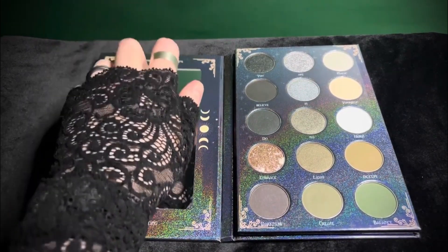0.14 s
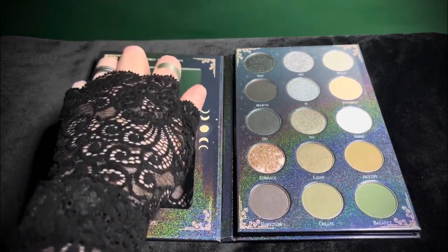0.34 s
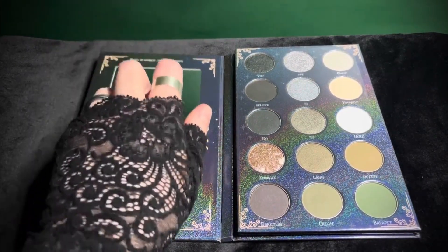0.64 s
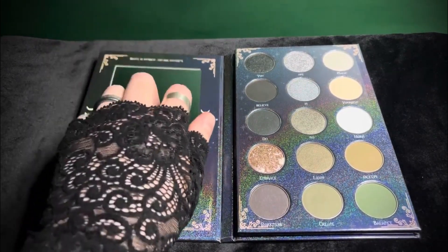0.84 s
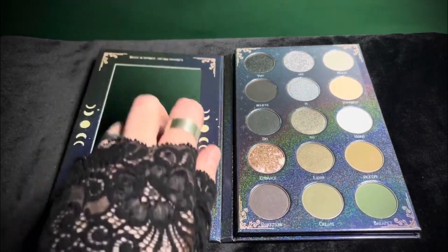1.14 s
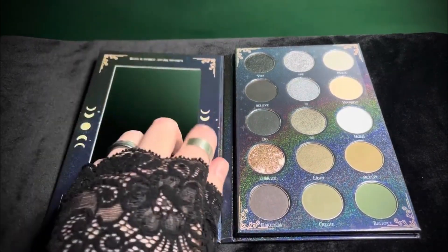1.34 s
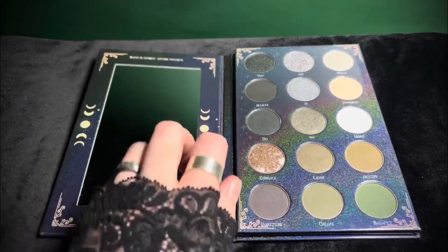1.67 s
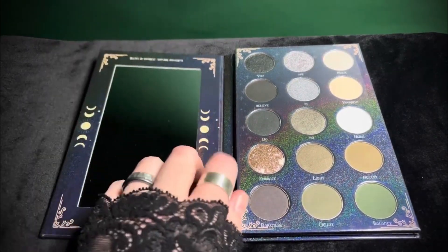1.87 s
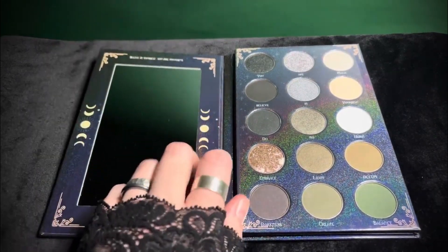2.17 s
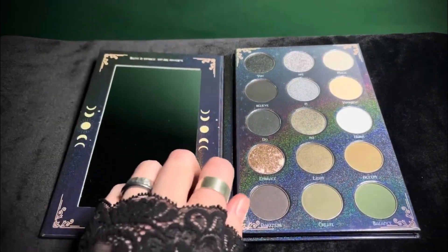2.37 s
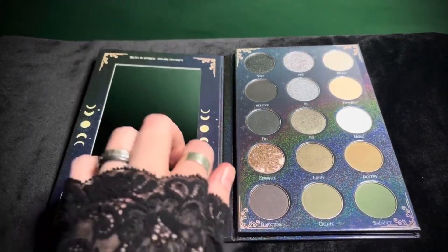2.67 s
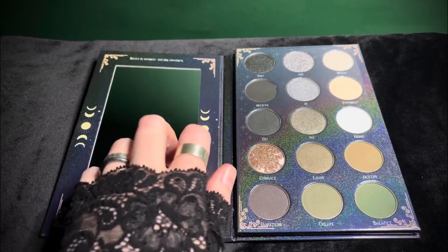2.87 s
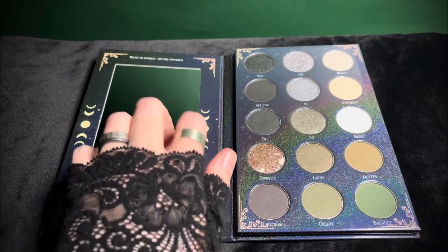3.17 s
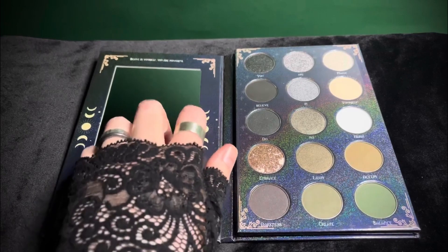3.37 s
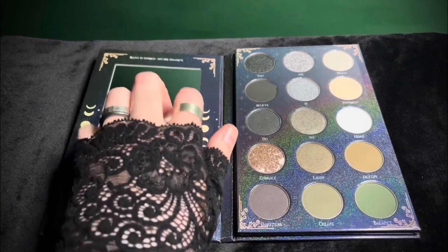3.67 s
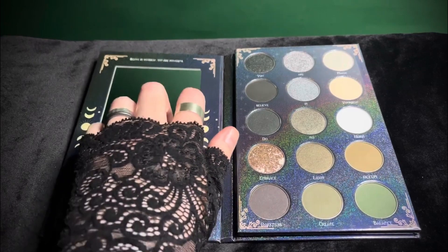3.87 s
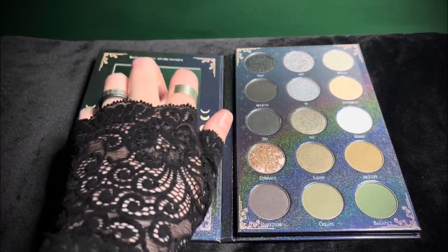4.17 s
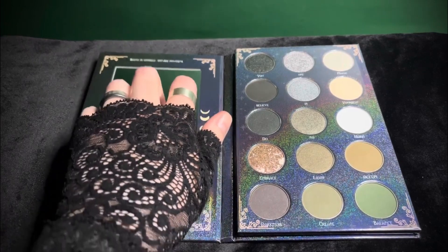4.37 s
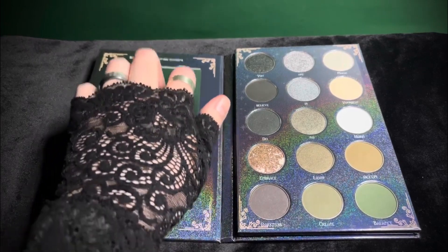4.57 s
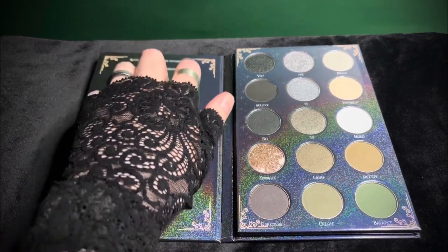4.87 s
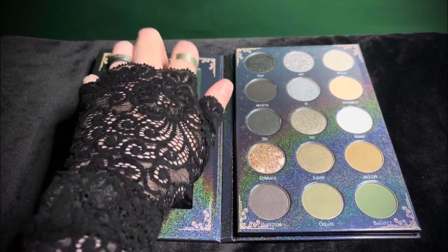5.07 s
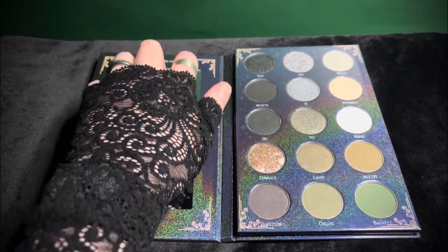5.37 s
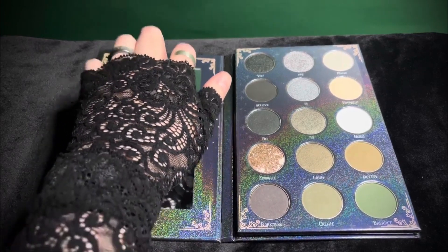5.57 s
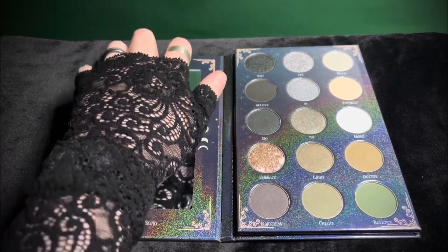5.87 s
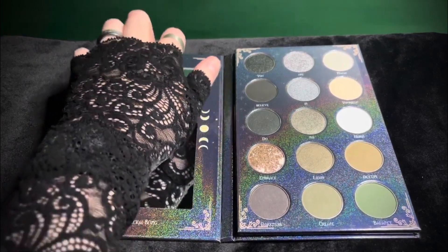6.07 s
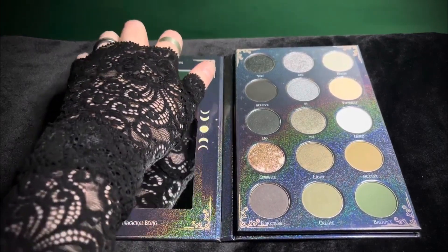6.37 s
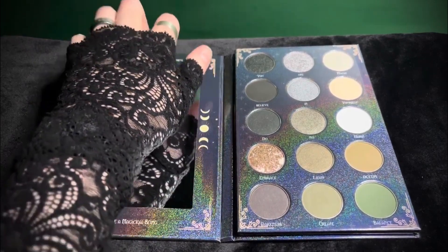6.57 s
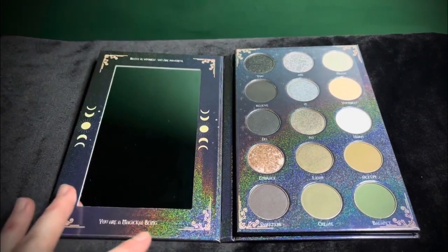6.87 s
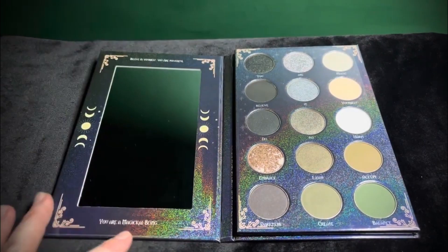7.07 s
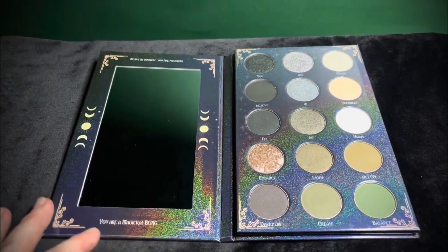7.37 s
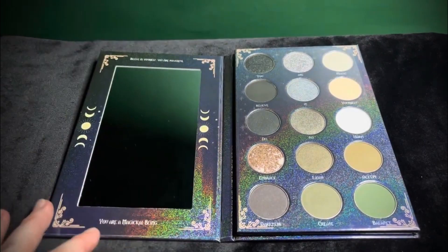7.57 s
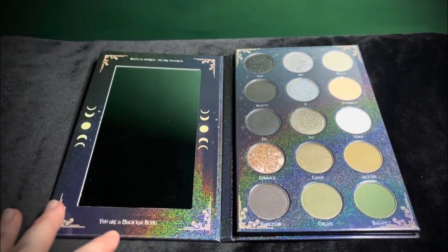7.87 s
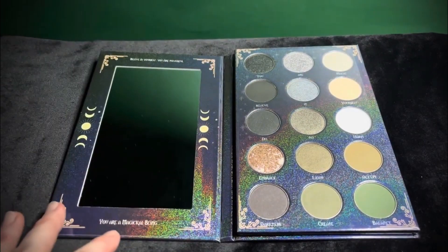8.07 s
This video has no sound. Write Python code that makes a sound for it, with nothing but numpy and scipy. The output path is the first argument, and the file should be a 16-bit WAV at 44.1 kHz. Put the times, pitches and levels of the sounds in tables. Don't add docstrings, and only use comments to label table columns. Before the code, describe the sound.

A close recording in a quiet room: steady low hum and soft hiss underneath, with nails drumming irregularly on a hollow, mirror-fitted cardboard lid. Taps vary from tiny ticks to firm woody knocks, strongest around three seconds, with a couple of tiny scrapes. Later taps are thinner and sharper. After the last cluster the background drops slightly, and a sleeve brushes very faintly before the end.

```python
import sys
import numpy as np
from scipy import signal
from scipy.fft import rfft, irfft
from scipy.io import wavfile
from scipy.ndimage import uniform_filter1d

SR = 44100
rng = np.random.default_rng(int(sys.argv[2]) if len(sys.argv) > 2 else 0)


def master(y):
    cut = np.clip(np.atleast_2d(y).T, -1, 1)
    pcm = np.round(cut * 32767)
    wavfile.write(sys.argv[1], SR, pcm.astype(np.int16))


def volts(x):
    e = np.asarray(x, float) / 20
    return 10 ** e


N = 362943


def colour(x, points):
    hz, db = np.transpose(points)
    f = np.maximum(np.fft.rfftfreq(len(x), 1 / SR), 1)
    gain = volts(np.interp(np.log(f), np.log(hz), db))
    return irfft(rfft(x) * gain, len(x))


def level(x, db):
    return x * volts(db) / np.sqrt(np.mean(x ** 2))


def band(x, hz, width_hz):
    return signal.lfilter(*signal.iirpeak(hz, hz / width_hz, fs=SR), x)


def fade(t, t60):
    return np.exp(-np.log(1000) * t / t60)


def walk(rate):
    hold = int(SR / rate)
    steps = np.repeat(rng.standard_normal(N // hold + 1), hold)
    return uniform_filter1d(uniform_filter1d(steps, hold), hold)[:N]


def add(out, s, sound):
    i = int(s * SR)
    out[i:i + len(sound)] += sound[:N - i]


def background():
    # (frequency [Hz], density [dB per Hz])
    air_points = [(12, -42), (20, -15.5), (37, 2), (58, -2), (123, -13.5), (198, -14), (301, -19.5),
                  (328, -28), (367, -24), (642, -34), (923, -36), (1000, -38), (16000, -46.5)]
    fan_hz, fan_width_hz = 178, 25
    drop_s, drop_length_s = 6.95, 0.31
    hiss_db, hiss_drop_db = 6.5, -4
    bass_db, bass_drop_db, bass_swell_db_per_s = 1.8, -6.5, 4
    since = np.arange(N) / SR - drop_s
    drop = np.clip(since / drop_length_s, 0, 1)
    swell_back_db = bass_swell_db_per_s * np.maximum(since - drop_length_s, 0)
    bass_gain_db = bass_db + bass_drop_db * drop + swell_back_db
    air = level(colour(rng.standard_normal(N), air_points), -63.5)
    bass = signal.sosfilt(signal.butter(2, 500, fs=SR, output="sos"), air)
    fan = band(rng.standard_normal(N), fan_hz, fan_width_hz)
    fan = band(fan, fan_hz, fan_width_hz)
    swell_db, waver_db = 2.2 * walk(5), 1.8 * walk(3)
    low = bass * volts(swell_db) + level(fan, -70.5) * volts(waver_db)
    return low * volts(bass_gain_db) + (air - bass) * volts(hiss_db + hiss_drop_db * drop)


def port_noise():
    # (frequency [Hz], density [dB per Hz])
    ports = [(12, -42.5), (20, -14), (65, -9.5), (129, -7.5), (378, -7.5), (1800, -24.5), (4510, -30.5),
             (9000, -49), (11700, -76.5), (19800, -120)]
    return level(colour(rng.standard_normal(N), ports), -76.5)


def tick(grit, ms, hz, top_db):
    t = np.arange(len(grit)) / SR - .001
    crack = grit * (fade(np.abs(t), .003) + .1 * fade(np.abs(t), .02)) * (t > 0)
    landing = 3.7 * np.sinc(t * SR)
    leaving = 2.4 * np.sinc((t - ms / 1000) * SR)
    crack = crack - landing + leaving
    crack = colour(crack, [(hz / 1.1, -3), (hz, 1), (hz + 1500, -2),
                           (max(hz + 1600, 8700), -2), (max(hz + 2400, 9500), top_db)])
    return crack / np.sqrt(np.sum(crack ** 2) / 32)


def ring_mode(t, part, hz, t60, share, twin):
    after = np.maximum(t, 0)
    partner_hz = hz * (1.27 + .04 * twin)
    pair = np.sin(2 * np.pi * hz * t) + share * np.sin(2 * np.pi * partner_hz * t)
    build = 1 - 0.55 * np.exp(-part / 0.6)
    choke = np.exp(-np.log(1000) * (after / (0.64 * t60)) ** 1.33)
    ahead = .22 * fade(after - t, .45 * t60)
    return pair * np.where(t > 0, build * choke, ahead)


def thump(after, s, hz, db):
    # (time [s], position [0 near edge - 1 far edge])
    hand_path = [
        (0, .7),
        (.55, .3),
        (.8, .4),
        (1.15, .05),
        (3.4, .05),
        (4.3, .4),
        (4.9, .8),
        (5.6, .95),
        (6.9, .95),
    ]
    place = np.interp(s, *np.transpose(hand_path))
    head = (.22 + .3 * place) * (1 - np.exp(-after / .0015))
    turns = hz * (0.867 + 0.063 * place) * after + head
    swing = np.sin(2 * np.pi * turns) * fade(after, 0.11)
    wobble = .25 * np.sin(2 * np.pi * (33 * after + head)) * fade(after, 0.44)
    return -volts(db + 1.5) * (swing + wobble) * (1 - np.exp(-after / 0.0036))


def nails():
    # (time [s],
    # push peak [dB], contact [ms], tick over push [dB], ring over push [dB])
    nail_strikes = [(0.0356, -25, 0.26, -6.5, -10.5), (0.1003, -21, 0.2, -10.5, -4.5),
                    (0.1945, -25.5, 0.18, -10, -8.5), (0.2427, -21, 0.53, -6.5, -4),
                    (0.554, -36.5, 0.53, -5, -22), (0.595, -25.5, .22, -16, -12),
                    (0.7196, -23, 0.65, -9, -13.5), (0.7825, -26.5, 0.64, -10, -12),
                    (1.158, -21, 0.87, -8, -2), (1.1719, -36, .38, -6.5, -8),
                    (1.2652, -22.5, 0.83, -11, -4.5), (1.672, -28, 1, -12.5, -2),
                    (1.7405, -24, 1, -11.5, -3.5), (1.8397, -22, 1, -9.5, -0.5),
                    (1.912, -19, 0.18, -6.5, -16), (2.1673, -27, 0.97, -15, -4.5),
                    (2.1828, -21.5, 0.89, -12.5, -4.5), (2.3013, -26.5, .99, -9.5, -9),
                    (2.4742, -24, 0.53, -9, -12.5),
                    (2.7631, -23.5, 0.76, -9, -5), (2.8564, -25.5, .6, -11.5, -5.5),
                     (2.905, -16.5, 0.7, -10, 0), (3.0251, -13.5, 0.8, -11.5, 0.5),
                     (3.216, -29, .53, -10.5, -18.5), (3.3117, -27.5, .7, -10.5, -15),
                     (3.381, -20, .83, -7.5, -4), (3.71, -35, 0.59, -6, -12.5),
                     (3.7822, -20.5, 0.31, -8, -5.5), (3.8696, -17.5, .68, -8, -4.5),
                     (3.9376, -23.5, 0.6, -11, -8), (4.1939, -39, 0.48, -1.5, -7),
                     (4.3107, -19.5, 0.63, -5, -1.5), (4.4342, -44, 0.48, -10, -11),
                    (4.7047, -25.5, 0.27, -4, -11.5), (4.8029, -26.5, 0.16, -15, -14),
                (4.859, -23.5, 0.56, -3, 0.5), (4.8817, -18, 0.48, -9.5, -4.5),
                (5.1664, -35, 0.21, -8.5, -14), (5.2576, -26.5, 0.18, -9.5, -11.5),
                (5.3403, -17.5, 0.49, -5.5, -4), (5.3756, -20.5, 0.49, -11, -11.5),
                (5.683, -30, 0.347, -5.5, -14.5), (5.745, -24.5, 0.27, -5, -8),
                (5.8027, -19.5, 0.16, -33, -16), (5.9004, -30.5, 0.396, -9.5, -8.5),
                (6.1358, -42, 0.35, -2.2, -1.5), (6.1978, -21, 0.278, -11.5, -17.5),
                (6.2991, -18.5, 0.15, -9.5, -13), (6.477, -60.5, 0.37, 5, -22),
                (6.6689, -34, .27, -3.5, -4.5), (6.7691, -29.5, 0.26, -9, -15),
                (6.8175, -21.5, .15, -19, -8), (6.835, -34.5, 0.28, -3, 8)]
    # (from [s], low mode [Hz], middle mode [Hz],
    # middle over low [dB], upper over push [dB])
    spots = [(-.1, 565, 986, -8.5, -10.5), (.45, 493, 1070, -4.5, -16), (1.05, 488, 860, -5.5, -10.5),
             (1.55, 465, 860, -7.5, -5), (1.88, 345, 875, 5, -2.5), (2.05, 462, 870, -6, -4),
             (2.4, 353, 890, -8, -31), (2.65, 458, 855, -3, -7.5), (3.13, 480, 900, 0, -19),
             (3.6, 510, 1062, 0.7, -24), (4.1, 572, 1034, -5, -16.5), (4.6, 567, 980, 2.5, -13.5),
             (5.05, 606, 1055, -1, -17), (5.55, 580, 888, -7, -8), (5.775, 373, 1100, -6.5, -8.5),
             (6.05, 446, 900, -17, -9.5), (6.57, 524, 1054, -8.5, -8), (6.72, 378, 1024, -17, -5.5)]
    # (from [s], table thump [Hz], thump [dB], box knock [Hz], knock over push [dB])
    under = [(-.1, 28.8, -35.5, 226, -13.5), (.15, 94.6, -38, 195, -13.5), (.45, 59, -37.5, 204, -10.5),
             (1.05, 56, -32, 190, -17.5), (1.55, 53.8, -29, 187, -12.5), (1.88, 53.5, -26.5, 140, -13),
             (2.05, 55.6, -31.5, 196, -12.5), (2.4, 56, -27, 137, -7), (2.65, 53, -31, 190, -13),
             (3.13, 59, -31.5, 199, -11.5), (3.6, 58.4, -32.5, 200, -9.5), (3.83, 97.5, -36.5, 198, -9),
             (4.1, 93.6, -39, 208, -10.5), (4.6, 94, -36.5, 206, -13), (5.05, 85.8, -37.5, 171, -22.5),
             (5.55, 79.7, -37.5, 228, -26), (6.05, 69.4, -37.5, 240, -16), (6.57, 68.2, -35, 232, -9)]
    # (time [s], tick top above 9 kHz [dB],
    # tick centre [Hz], upper mode [Hz])
    reach = [(0, 2, 3900, 1660), (.7, -1, 3600, 1600), (1.2, -1, 4300, 1830), (1.7, -3, 4600, 1600),
             (1.95, -4, 4500, 1810), (2.25, -8, 4200, 1580), (2.9, -1, 5000, 1820), (3.4, -5, 5200, 1460),
             (3.9, -5, 6000, 1460), (4.3, -2, 4400, 1680), (4.9, -0.5, 4800, 1420), (5.4, 2, 5400, 1500),
             (5.7, 2.5, 5600, 1720), (6.3, -8, 3200, 1780), (6.9, -11, 4200, 1780)]
    # (frequency [Hz], level [dB])
    tick_colour = [(1200, -20), (2200, 3), (3500, 1.5), (5500, -2), (7500, -7.5), (10000, -11.5),
                   (12500, -11), (16000, -25.5)]
    # (time [s], level [dB])
    grazes = [
        (1.3795, -50),
        (1.9101, -29),
        (2.4736, -24),
        (2.565, -53),
        (3.4625, -50),
        (6.1970, -41),
    ]
    # (time [s], thump [Hz], level [dB])
    pad = (1.379, 52, -30.5)
    # decay t60 [s], then level of the neighbour mode [ratio]
    ring_t60_s = (.03, .02, .011)
    partner = (.25, 0.43, .15)
    scatter = (.025, .03, .015, .08, .12)
    lead = .008
    lid, far, ticks, edges, table = np.zeros((5, N))
    t = np.arange(8192) / SR - lead
    after = np.maximum(t, 0)
    reach_s, reach_db, reach_hz, reach_upper_hz = np.transpose(reach)
    taps = nail_strikes
    grit = rng.standard_normal((len(taps), 512))
    chance = rng.standard_normal((len(taps), 9))
    gaps = np.diff(np.array(taps)[:, 0], prepend=-1)
    for (s, db, ms, tick_db, low_db), gap, g, d in zip(taps, gaps, grit, chance):
        _, low_hz, middle_hz, middle_db, upper_db = [row for row in spots if row[0] < s][-1]
        _, thump_hz, thump_db, knock_hz, knock_db = [row for row in under if row[0] < s][-1]
        if gap > .21:
            knock_hz, knock_db = 251.8, knock_db + 3.5
        nail_hz = np.interp(s, reach_s, reach_hz) * 2 ** (0.4 * (db + 23.5))
        upper_hz = np.interp(s, reach_s, reach_upper_hz)
        pitches = np.array([low_hz, middle_hz, upper_hz, knock_hz, nail_hz])
        *ring_hz, knock_hz, nail_hz = pitches * np.exp(scatter * d[3:8])
        ring = (low_db, low_db + middle_db, upper_db + 0.68 * (tick_db + 7.5))
        top_db = np.interp(s, reach_s, reach_db) - 5 * ms + 2 * d[8]
        part = after / (ms / 1000)
        push = -np.sin(np.pi * np.clip(part, 0, 1) ** 0.6)
        modes = -volts(knock_db) * np.sin(2 * np.pi * knock_hz * after) * fade(after, 0.0553)
        for hz, ring_db, t60, share, twin in zip(ring_hz, ring, ring_t60_s, partner, d):
            modes -= volts(ring_db - 1) * ring_mode(t, part, hz, t60, share, twin)
        far_push = -4.76 * part * np.exp(-4.2 * part)
        add(lid, s - lead, volts(db) * (push + modes))
        add(far, s - lead, volts(db) * (.25 * modes + far_push))
        add(ticks, s - .001, volts(db + tick_db + 2.5) * tick(g, ms, nail_hz, top_db))
        edge = colour(np.sinc(np.arange(-32, 32)), [(7000, 0.0025), (9500, top_db)])
        add(edges, s - 32 / SR, -volts(db + tick_db + 14) * edge)
        add(table, s - lead, thump(after, s, thump_hz, thump_db + .35 * (db + 25)))
    add(table, pad[0] - lead, thump(after, *pad))
    for s, db in grazes:
        add(lid, s, -volts(db) * np.hanning(12))
    return lid + colour(ticks, tick_colour) + table, far + colour(edges, tick_colour)


def room(x):
    # (centre [Hz], level [dB], t60 [s])
    tail_bands = [(124.4, -10, 0.092), (263.7, -27, 0.085), (562, -40, 0.059), (900, -23.5, 0.23),
                  (1360, -26.5, 0.17), (3054, -34.5, 0.084), (6400, -27, 0.057), (10980, -35.5, 0.076)]
    wall_s, wall_db = .0198, -28.5
    t = np.arange(16384) / SR
    tail = np.zeros(len(t))
    for hz, db, t60 in tail_bands:
        diffuse = band(rng.standard_normal(len(t)), hz, 1.1 * hz)
        tail += volts(db - 9.0) * diffuse * fade(t, t60)
    tail *= 1 - np.exp(-t / 0.0044)
    late = np.maximum(t - wall_s, 0)
    echo = rng.standard_normal(len(t)) * fade(late, 0.005) * (t > wall_s)
    tail += volts(wall_db) * band(echo, 3500, 8000)
    return signal.fftconvolve(x, tail)[:N]


def sleeve():
    # (peak time [s], peak level [dB], rise [dB/s], fall [dB/s], centre [Hz])
    brushes = [
        (6.95, -76.5, 149.5, 65.5, 7200),
        (7.2, -86, 40, 42, 1697),
        (7.72, -80.5, 119.5, 120, 2500),
        (8.14, -86, 111.5, 70, 1495),
    ]
    slowing_oct_per_s = 3.44
    out = np.zeros(N)
    start = int((brushes[0][0] - 1) * SR)
    t = np.arange(start, N) / SR
    for centre_hz in 500 * 2 ** np.arange(0, 4.1, .5):
        grains = rng.standard_normal(N) * volts(2.4 * walk(140))
        fibres = level(band(grains, centre_hz, centre_hz / 3), -2)[start:]
        for s, db, rise, fall, hz in brushes:
            off = np.log2(centre_hz / hz) + np.clip(slowing_oct_per_s * (t - s), 0, 1)
            stroke_db = db + np.minimum(rise * (t - s), -fall * (t - s))
            out[start:] += fibres * np.exp(-(off / 0.77) ** 2) * volts(stroke_db)
    return out


def scene():
    near, far = nails()
    mid = near + room(far) + background() + sleeve()
    side = port_noise()
    return np.array([mid + side, mid - side])


def roll_off(x):
    return signal.sosfilt(signal.butter(12, 16650, fs=SR, output="sos"), x)


def record(dry):
    dry = signal.sosfilt(signal.butter(1, 18, "highpass", fs=SR, output="sos"), dry)
    mix = signal.sosfilt(signal.ellip(8, .2, 60, 15900, fs=SR, output="sos"), dry)
    return roll_off(mix)


dry = scene()
out = record(dry)
master(out)
```